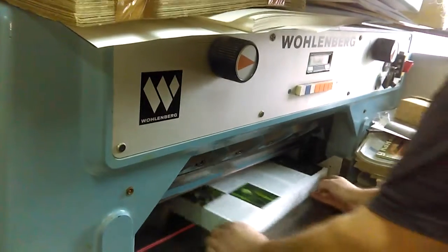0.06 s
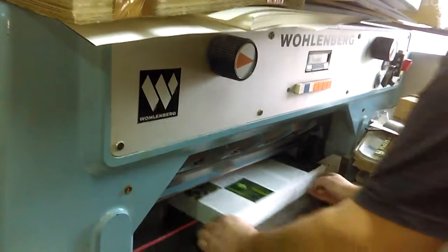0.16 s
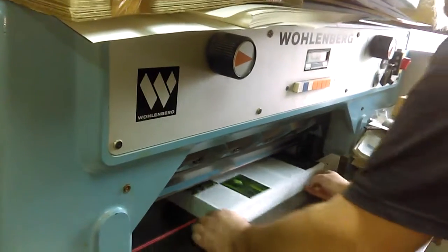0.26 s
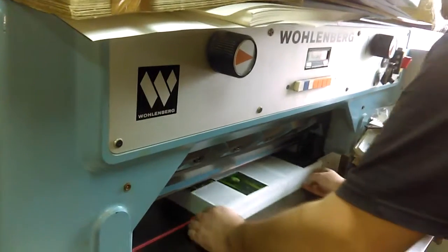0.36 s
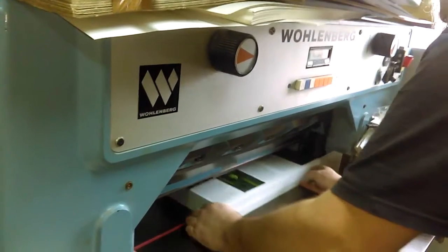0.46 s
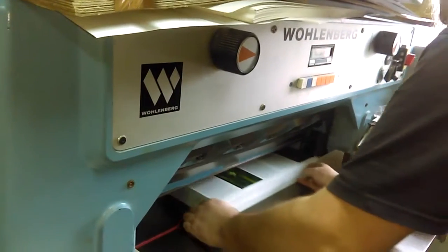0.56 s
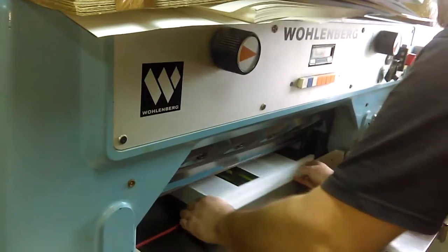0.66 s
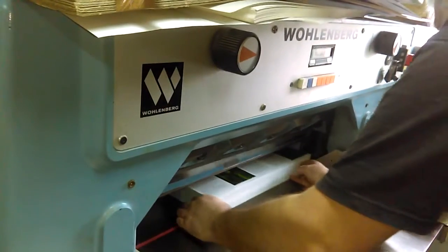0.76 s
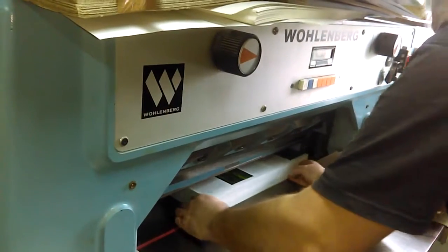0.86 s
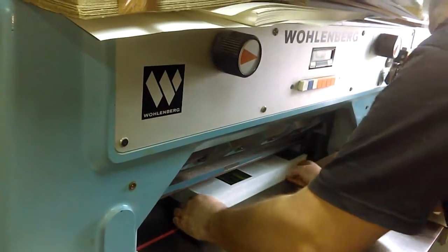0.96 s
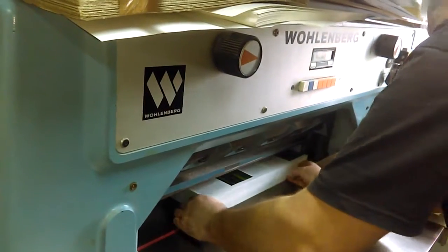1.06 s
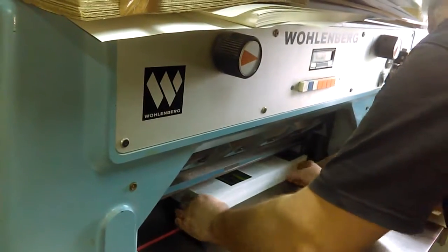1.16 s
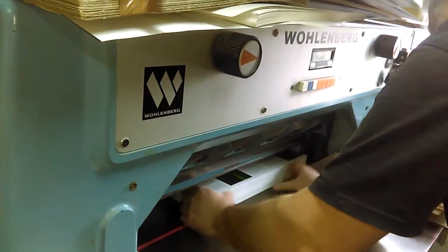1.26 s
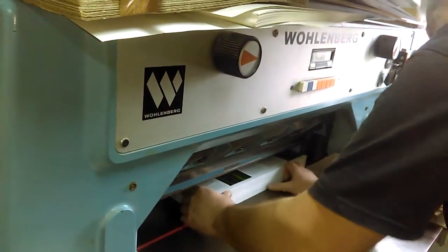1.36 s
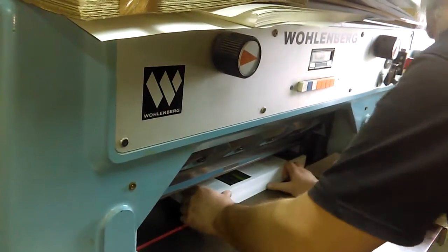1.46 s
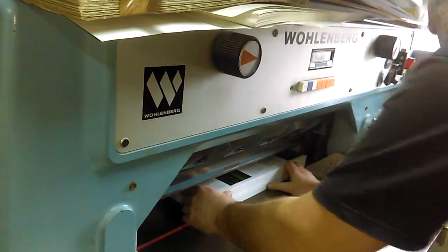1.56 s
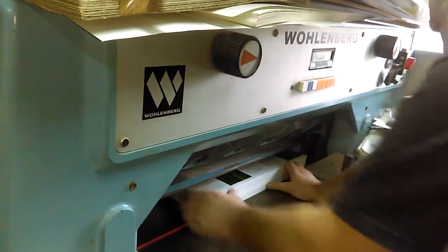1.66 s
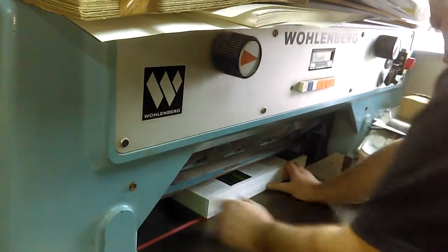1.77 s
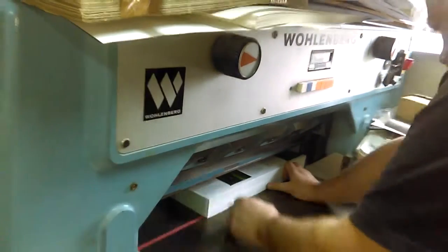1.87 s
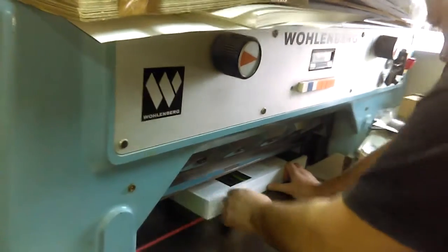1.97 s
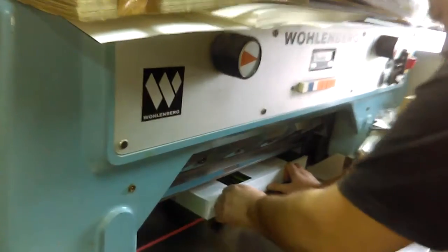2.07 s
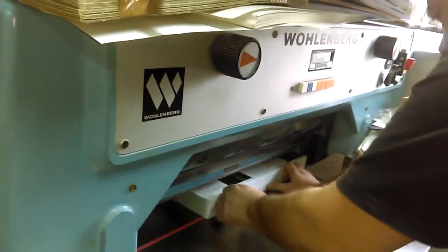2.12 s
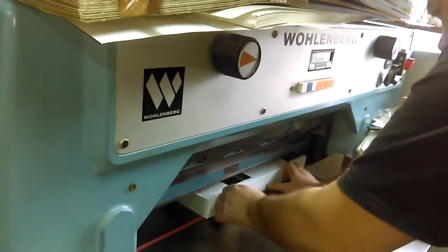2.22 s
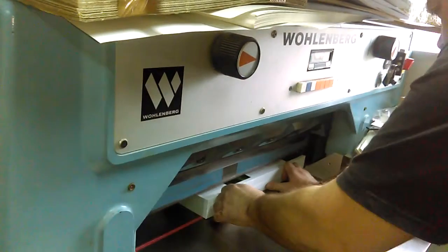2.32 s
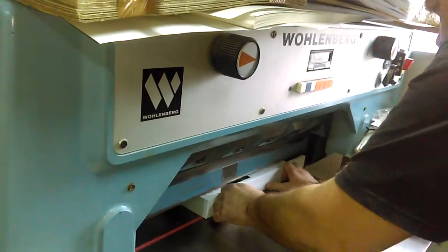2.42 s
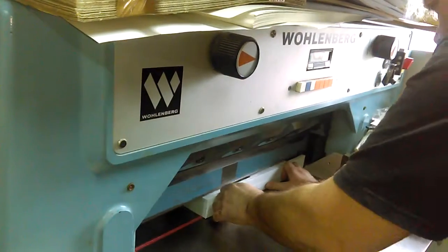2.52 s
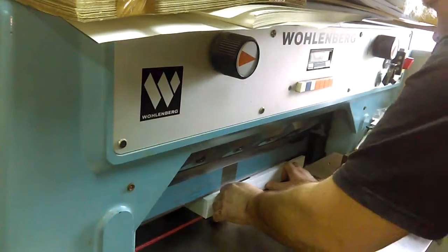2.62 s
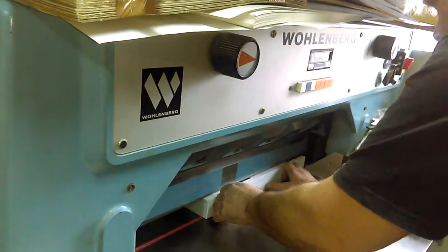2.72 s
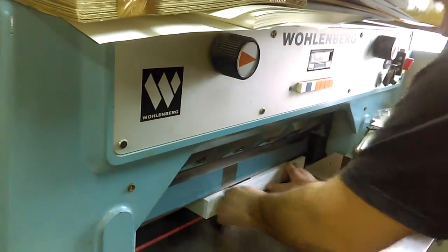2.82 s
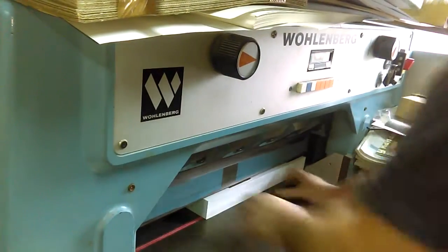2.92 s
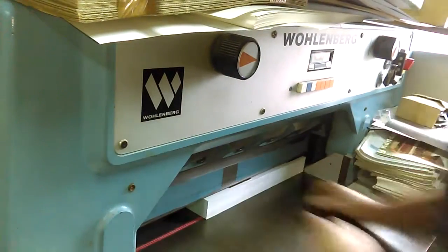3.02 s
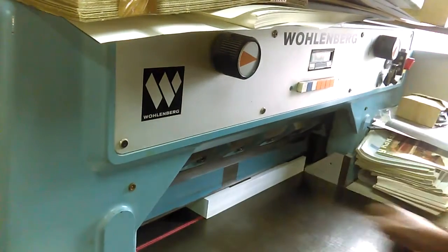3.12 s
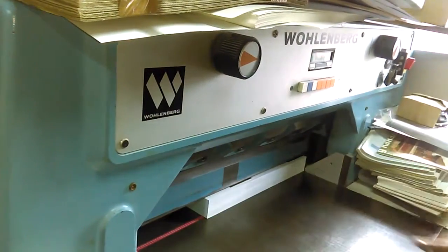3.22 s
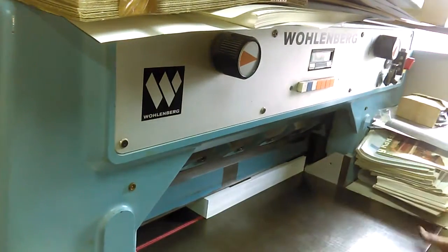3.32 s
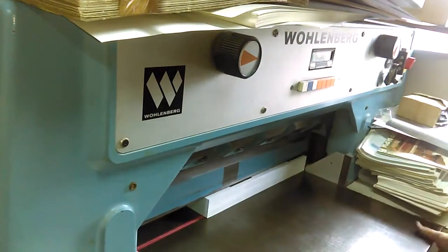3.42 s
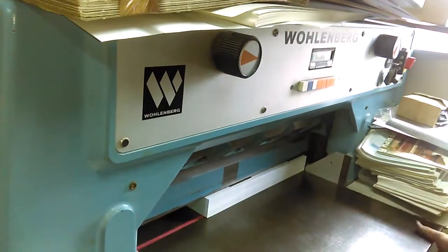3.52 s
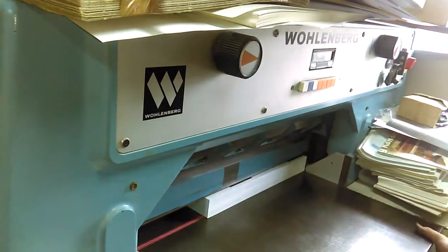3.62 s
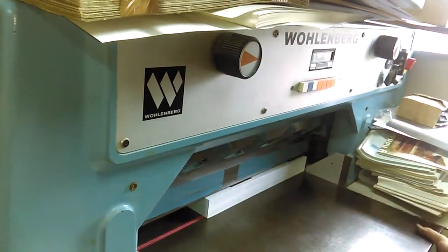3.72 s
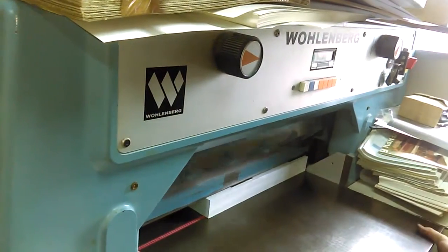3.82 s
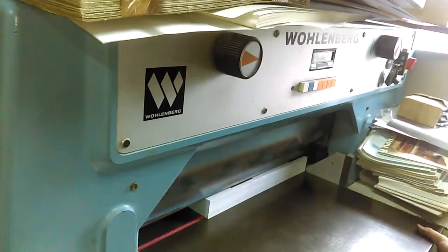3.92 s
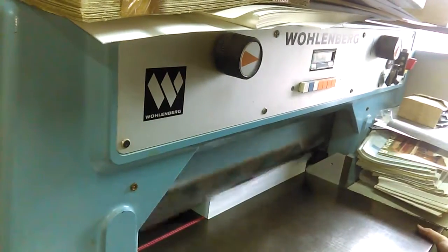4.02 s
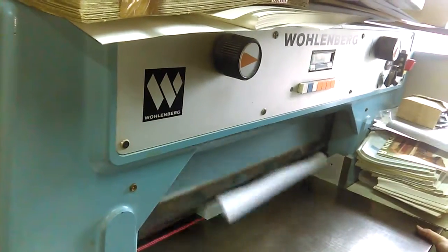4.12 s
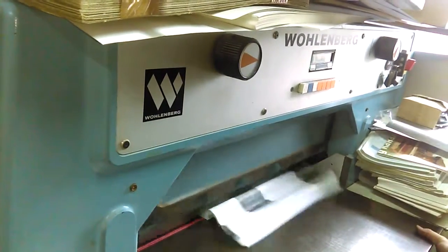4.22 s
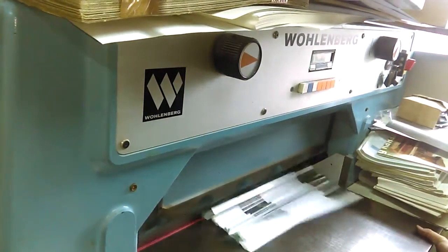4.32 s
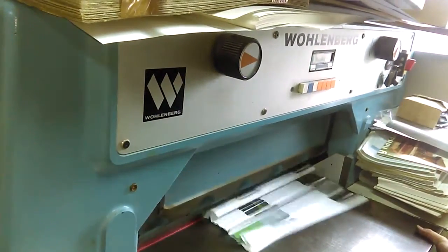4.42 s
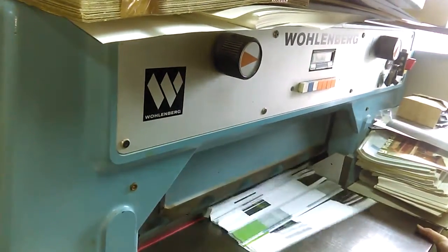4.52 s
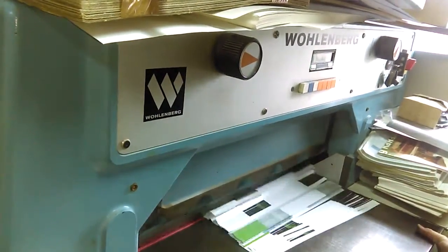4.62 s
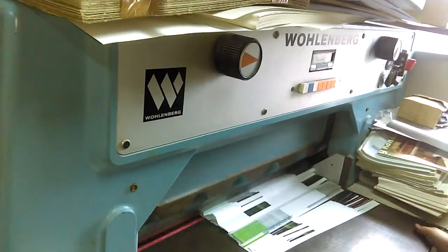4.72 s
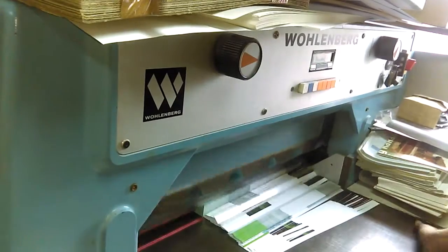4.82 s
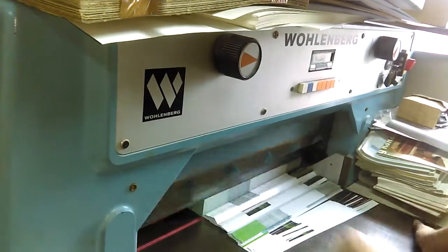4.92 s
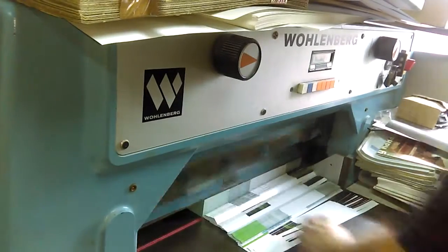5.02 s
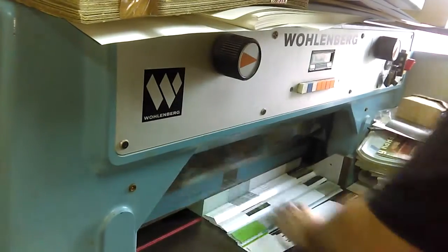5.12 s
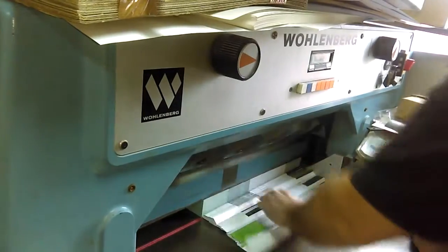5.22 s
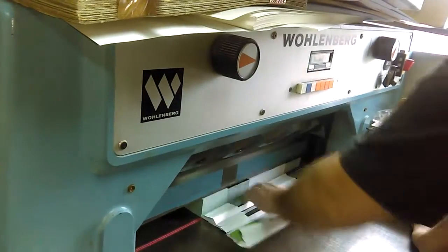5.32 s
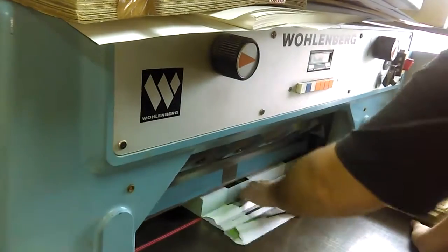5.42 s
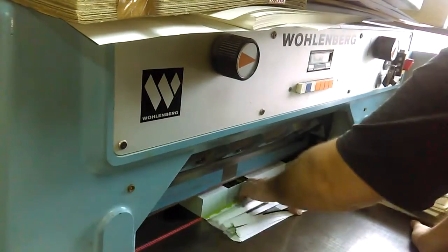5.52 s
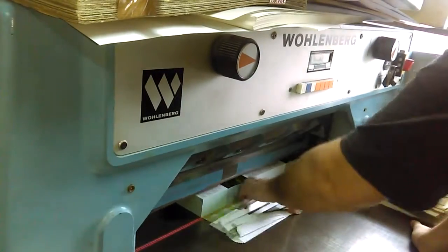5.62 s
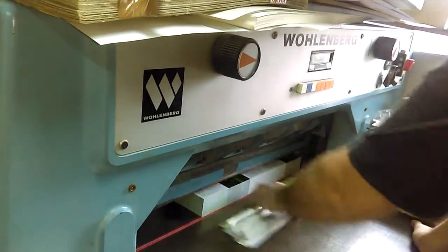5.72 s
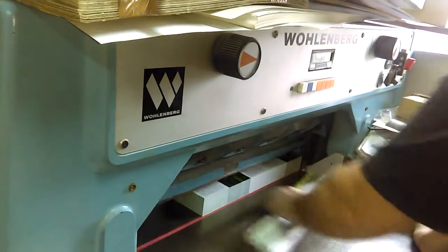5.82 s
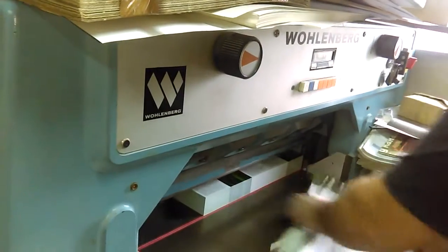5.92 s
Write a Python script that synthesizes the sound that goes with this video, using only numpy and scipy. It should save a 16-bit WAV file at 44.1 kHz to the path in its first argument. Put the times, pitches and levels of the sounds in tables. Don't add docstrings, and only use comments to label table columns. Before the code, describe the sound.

Close to a paper guillotine in a small print shop, a faint steady electric hum sits over low room noise. At about 0.3 s a loose stack slaps down with a soft flutter; firmer knocks against the metal gauge follow at 1.0 and 2.1 s. Hands slide and paper rustles lightly, with crisp touches from 2.4 to 3.5 s. At 3.65 s the clutch clacks with a bright metallic ring and the drive starts roaring. A short groan leads to the clamp's heavy slam at 3.9 s. From 4.06 to 4.48 s the blade bites hard and zips through the sheets, a bright gritty tear whose pitch falls steadily as it slows. Dull thumps and a paper flop end the cut around 4.5 s. Pump and gears whine and throb until a ringing brake clunk near 5.25 s, and the drive quickly stops. Hands rustle the offcuts away, with a small sharp knock at 5.95 s.

```python
import sys
import numpy as np
from scipy import signal
from scipy.fft import rfft, irfft, next_fast_len
from scipy.io import wavfile
from scipy.ndimage import uniform_filter1d

SR = 44100
rng = np.random.default_rng(int(sys.argv[2]) if len(sys.argv) > 2 else 0)


def file_out(sig):
    cols = np.atleast_2d(sig).T
    lim = np.clip(cols, -1, 1)
    pcm = np.round(lim * 32767).astype(np.int16)
    wavfile.write(sys.argv[1], SR, pcm)


def field_ratio(decibels):
    return 10 ** (np.asarray(decibels, dtype=float) / 20)


N = 263393
STEP = 32
TIME_S, SLOW_S = np.arange(N) / SR, np.arange(0, N, STEP) / SR
EDGES_HZ = 22 * 2 ** np.arange(0, 9.7, .4)
CENTRES_HZ = np.sqrt(EDGES_HZ[1:] * EDGES_HZ[:-1])

# frequency in Hz, side minus mid in dB.
SIDE_DB = [(60, -39), (110, -17.5), (200, -22), (380, -11.5), (700, -6), (1290, -2), (2380, 1), (4400, 2),
           (8120, -1), (15000, 0.5)]
# frequency in Hz, left minus right in dB.
LEFT_DB = [(60, 1), (110, 0.5), (200, 2), (380, -2), (700, 2), (1290, -6), (2380, -11), (4400, -8.5),
           (8120, -14), (15000, 0)]

# frequency in Hz, level in dB per Hz.
SHOP_COLOUR = [(25, -14), (55, -29), (100, -3.5), (220, -4.5), (450, -12), (900, -10.5), (1800, -18),
               (3200, -26), (6500, -32.5), (9500, -38), (13000, -42), (16000, -35)]
SHOP_DB, SHOP_SWELL_S, SHOP_SWELL_DB_PER_S = -51, 5.47, 10.5
ROOM_T60_S, WALL_CUT_HZ, ROOM_DB = 0.32, 7100, -10.5

# start in seconds, level in dB, t60 in seconds.
FLOOR_JOLTS = [
    (.97, -41, 0.79),
    (2.08, -35.5, 0.79),
    (2.7, -45, 0.74),
    (3.67, -48, .3),
    (3.9, -18.5, 1.3),
    (4.1, -39, 0.97),
    (4.55, -36, 2),
    (5.25, -30.5, 1.34),
]
FLOOR_HZ, FLOOR_IDLE_DB, FLOOR_RISE_S = 35.7, -72, 0.049
BED_HZ, BED_IDLE_DB, BED_BLOW_DB, BED_DRIVE_DB = 125.6, -55.5, -7, -1.5
BED_T60_S, BED_RISE_S = 0.57, 0.034

# multiple of BUZZ_HZ, level in dB.
BUZZ = [(1, -58), (2, -56), (3, -55), (4, -67.5), (5, -69.5), (6, -0.5), (7, -61), (8, -55.5), (9, 3.5),
        (10, -96), (11, -79), (12, -78), (13, -71), (14, -70), (17, -70), (18, -71), (19, -70.5),
        (30, -75.5)]
BUZZ_HZ = 100.1
PANEL_MULTIPLES = [6, 9]
# time in seconds, lower panel in dB, upper panel in dB.
PANEL_SHADE = [(0, -71, -61.5), (.45, -61, -58.5), (1.5, -50.5, -58.5), (1.85, -54.5, -63.5),
               (2.1, -53, -60), (2.5, -70, -67.5), (2.9, -60, -59), (3.6, -52, -51.5), (5.55, -62.5, -61),
               (5.97, -55.5, -51)]

# start in seconds, level in dB, centre in Hz, t60 in seconds.
RUSTLES = [(.975, -38, 3000, .2), (1.0, -44, 3000, .2), (4.47, -27, 2700, .4), (4.55, -35, 2700, .3),
           (5.59, -41, 3300, .08), (1.22, -57, 10900, .5), (1.668, -44, 6170, 0.16),
           (1.969, -47, 9000, 0.054), (2.185, -51, 8500, 0.066), (2.358, -46.5, 8100, 0.22),
           (2.40, -48.5, 8400, 0.23), (2.44, -50, 7940, 0.58), (2.533, -39, 9300, 0.088),
           (2.61, -46, 8300, 0.67), (2.38, -47, 2800, 0.97), (2.52, -47, 2840, 0.94),
           (2.63, -44.5, 2500, 0.44), (2.66, -43, 8500, 0.15), (2.811, -41.5, 8300, 0.11),
           (2.835, -39.5, 6400, 0.14), (3.004, -50.5, 9200, .3), (3.2, -46, 11700, 0.23),
           (3.423, -38, 5700, 0.19), (3.46, -39, 6500, 0.19), (5.428, -31, 4870, 0.22),
           (5.505, -30, 5000, 0.32), (5.592, -37, 4970, 0.12), (5.647, -47, 9450, 0.51),
           (5.712, -42, 4040, 0.5)]
# time in seconds, pan in dB.
HANDS = [(1.7, -9), (2.0, -10), (2.9, -12.5), (3.1, -2), (3.4, -10)]
# middle in seconds, half length in seconds, level in dB.
SLIDES = [(0.0, 0.35, -53.5), (.75, 0.31, -62.5), (1.623, 0.76, -65.5), (2.57, 0.11, -55),
          (3.12, 0.2, -55.5), (5.9, 0.37, -46.5)]

# frequency in Hz, level in dB per Hz.
DRIVE_COLOUR = [(15, -54), (25, -35), (108, 0.5), (175, -7), (242, -15), (309, -7), (344, -0.5),
                (394, -8.5), (754, -9), (936, -11), (2760, -22.5), (7110, -35), (10100, -38), (13200, -37),
                (16000, -79)]
ENGAGE_S, RELEASE_S, DRIVE_DB, SPIN_UP_S, RUN_DOWN_T60_S = 3.68, 5.31, -35.5, .01, 0.096
SHAFT_HZ, SHAFT_THROB_DB = 25.4, 0.5
# frequency in Hz, level in dB.
WHINE = [(96.9, -45.5), (247.6, -39), (344.5, -42), (495.3, -48), (619.1, -51), (742.9, -50),
         (791.3, -53.5), (893.6, -56), (1039, -54), (1114, -67), (1190, -56), (1410, -58), (1486, -53.5),
         (1733, -56.5), (2229, -60), (2724, -58), (2749, -56.5), (2821, -64), (2896, -62), (3192, -70),
         (3488, -82), (3962, -65), (4210, -64), (4234, -64), (4307, -69), (4452, -68), (10374, -69)]
# time in seconds, level in dB.
PRESSURE = [(3.67, -40), (3.70, -5.5), (4.05, 3.5), (4.5, -13.5), (4.7, 5), (5.3, 5), (5.4, -11),
            (5.6, -18), (5.7, -44)]
RETURN_HZ, RETURN_S, RETURN_HELD_DB = 344.5, 4.78, -14
# frequency in Hz, width in Hz, level over the drive colour in dB.
HOUSING = [(754, 160, 5), (1490, 150, 4.5), (2230, 210, 7.5), (2750, 220, 8.5), (3130, 170, 3.5),
           (3960, 74, 3), (4230, 300, 9.5), (5450, 360, 5.5), (9680, 200, 8), (10400, 200, 6),
           (11200, 500, 5)]
HOUSING_FLOOR_DB, GEARS_HZ, GEARS_DB, GEARS_FOLLOW = -1, 24.765, -36, .5

# start in seconds, 0.7-3 kHz in dB, body in dB, treble in dB, t60 in seconds.
BLOWS = [(0.321, -33, -46, -61, 0.08), (.354, -37.5, -40, -68, 0.29), (0.973, -21.5, -29.5, -53.5, 0.3),
         (2.060, -19, -26.5, -43, 0.35), (3.628, -39, -56, -32.5, 0.22), (3.677, -30, -43, -24, 0.27),
         (3.687, -26, -23, -33, 0.41), (3.719, -43, -26, -24.5, 0.48), (3.88, -10, -11, -26, 0.31),
         (4.066, -10, -15.5, -27, 0.24), (4.46, -22.5, -17.5, -33.5, 0.47), (4.49, -27, -25, -43, 0.3),
         (4.535, -29, -26, -45, 0.46), (4.566, -25, -16.5, -41.5, 0.41), (5.217, -26, -31, -36, 0.71),
         (5.252, -25, -15.5, -26.5, 0.37), (5.28, -24, -22.5, -47, 0.64), (5.947, -33.5, -57, -30, 0.22)]
BLOW_BANDS_HZ = [120, 380, 1400, 7000]
THUMP_DB = -5
# frequency in Hz, t60 factor.
LINGER = [(30, 2.1), (100, 1.4), (400, 0.81), (2000, 0.69), (10000, 0.58)]
# frequency in Hz, level in dB, t60 in seconds.
FRAME = [(127, -12, 0.33), (228, -38, 0.8), (324.7, 3.5, 0.18), (471, 2, 0.31), (630, -18, 0.7),
         (1370, -34, 0.5), (1696, -8, 0.045), (1860, -50, 0.17), (1870, -48, 0.67), (2150, -47, 0.38)]
# frequency in Hz, level in dB, t60 in seconds.
STACK = [(480, -1, .09), (590, 1, .12), (690, -5, 0.063), (980, -20, .08), (1114, -9, .1)]
# start in seconds, level in dB.
STACK_SLAPS = [(.352, -36), (.358, -25), (.367, -32), (.375, -30), (.384, -38), (.397, -38), (.41, -43)]
# start in seconds, level in dB, frequency in Hz, t60 in seconds.
TICKS = [(1.03, -53, 2640, 0.12), (1.062, -53, 2640, 0.17), (.974, -33, 1600, .06),
         (.975, -30.5, 480, 0.075), (.323, -39, 1300, .02), (3.631, -40, 3200, .015),
         (.323, -48, 2000, .015), (3.884, -9, 1500, .015), (3.729, -17, 10500, .03),
         (2.064, -40.5, 3680, 0.24), (2.1, -48, 3680, .2), (2.183, -49, 2650, 0.044),
         (2.088, -35, 2260, .06), (.323, -39, 900, 0.032), (4.459, -11, 520, 0.038), (4.399, -17, 470, .05),
         (5.89, -47, 1850, 0.055), (3.882, -15.5, 1870, 0.056), (2.062, -25, 2060, 0.052),
         (2.063, -20, 1054, 0.043), (5.276, -29, 5260, 0.18), (5.273, -18.5, 391, 0.15),
         (5.33, -30, 121, 0.91), (2.19, -38.5, 76, .5), (3.678, -31.5, 2090, .05), (3.702, -29, 2040, .06),
         (3.634, -35, 1670, 0.044), (3.689, -19, 166, .08), (3.79, -27, 147, .12), (3.885, -13, 424, 0.044),
         (3.701, -16.5, 117, 0.15), (3.883, -10.5, 327, 0.15), (3.92, -14, 482, 0.1),
         (4.072, -10, 2830, 0.038), (4.071, -9.5, 331, 0.14), (5.257, -23.5, 2680, 0.066),
         (5.259, -28.5, 1930, 0.11), (5.571, -35.5, 1570, 0.036), (5.59, -39, 3450, 0.035),
         (5.947, -17.5, 2010, 0.015), (5.946, -29, 1160, 0.029), (5.947, -42, 3370, 0.024)]
# frequency in Hz, width in Hz, level in dB, delay in seconds.
CLUTCH = [(5067, 59, -3, 0.013), (5420, 210, -3, 0.01), (5230, 190, -3.5, 0.00074), (5440, 130, -5, 0.001),
          (9870, 240, -8.5, 0.016), (10020, 140, -7.5, 0.0067), (10540, 44, -3.5, 0.0026),
          (10350, 210, -4, 0.0012), (10950, 160, -4.5, 0.001), (12650, 250, -36, .01),
          (14900, 400, -42, .02)]
# start in seconds, level in dB, build-up in seconds, t60 in seconds.
CLUTCH_SLIPS = [
    (3.713, -3, 0.0058, 0.13),
    (5.26, -16.5, 0.01, 0.11),
]
CLUTCH_RUB_DB = -17
GROAN_S, GROAN_END_S, GROAN_RISE_S, GROAN_HZ, GROAN_WIDTH_HZ, GROAN_DB = 3.74, 3.94, .04, 490, 26, -33

# frequency in Hz, level in dB per Hz.
TEARING_COLOUR = [(150, -38), (500, -35), (1200, -7), (2500, 3.5), (4500, -2.5), (6500, 1), (8500, -3),
                  (12500, -5.5), (16000, -16)]
TEAR_DB, TEAR_FADE_DB_PER_S, TEAR_KNEE_S, TEAR_FOLLOWS, CUT_PAN_DB = -20, -30, 4.194, 0.065, -9
# time in seconds, sheets per second.
SHEETS = [(4.059, 1920), (4.115, 1750), (4.158, 1590), (4.244, 1157), (4.318, 846), (4.345, 700),
          (4.385, 545), (4.42, 455), (4.48, 300)]
# time in seconds, level in dB.
BITE = [(4.065, -19), (4.085, -8), (4.11, -6), (4.145, 0), (4.19, -4.5), (4.235, 0.5), (4.3, 0), (4.39, -1),
        (4.48, -7.5)]
# start in seconds, level over the tone in dB.
BUNCHES = [(4.12, 4), (4.14, 9), (4.154, 8), (4.172, 3), (4.221, 6), (4.237, 4), (4.264, 4), (4.295, 3),
           (4.312, 8), (4.33, 3), (4.352, 4), (4.364, 5), (4.398, 6), (4.412, 5), (4.44, 3), (4.455, 5)]
BUNCH_S, BETWEEN_DB = .007, -3
# frequency in Hz, width in Hz, level in dB.
SNAP = [(430, 100, -21), (590, 70, -17), (790, 130, -13), (1230, 130, -13), (1684, 160, -19),
        (2240, 300, -18), (3200, 590, -21), (3670, 400, -21), (5200, 1100, -21)]


def in_time(rows, step=1):
    s, *columns = np.transpose(rows)
    return [np.interp(np.arange(0, N, step) / SR, s, c, left=c[0], right=c[-1]) for c in columns]


def at_hz(points, hz):
    table_hz, value = np.array(points).T
    return np.interp(np.log(hz), np.log(table_hz), value)


def drift(rate_hz, count):
    r = np.exp(-2 * np.pi * rate_hz * STEP / SR)
    white = rng.standard_normal((count, N // STEP + 3001))
    slow = signal.lfilter([1], [1, -2 * r, r * r], white)[:, 3000:]
    return slow / slow.std(axis=1, keepdims=True)


def full(slow):
    return np.interp(np.arange(N) / STEP, np.arange(len(slow)), slow)


def sides(pan_db):
    return field_ratio(np.array([pan_db / 2, -pan_db / 2]))


def balance():
    return field_ratio(np.outer([1, -1], at_hz(LEFT_DB, CENTRES_HZ)))[:, :, None]


def band_share(colour):
    power = field_ratio(at_hz(colour, CENTRES_HZ)) ** 2 * np.diff(EDGES_HZ)
    return (power / power.sum())[:, None]


def noise_bank(power):
    out, white = np.zeros((2, N)), rng.standard_normal((2, 2, N + SR))
    for k, (low, high) in enumerate(zip(EDGES_HZ, EDGES_HZ[1:])):
        band = signal.butter(2, [low, high], "band", fs=SR, output="sos")
        mid, side = signal.sosfilt(band, white[k % 2])[:, SR:]
        wide = field_ratio(at_hz(SIDE_DB, CENTRES_HZ[k]))
        unit = np.sqrt(SR / 2 / (high - low) / (1 + wide ** 2))
        for c, sign in enumerate((1, -1)):
            out[c] += unit * full(np.sqrt(power[c, k])) * (mid + sign * wide * side)
    return out


def dying(start_s, t60_s, rise_s):
    t = np.maximum(SLOW_S - start_s, 0)
    return ((1 - np.exp(-t / rise_s)) * field_ratio(-60 * t / t60_s)) ** 2


def resonate(x, hz, width_hz):
    r = np.exp(-np.pi * width_hz / SR)
    poles = [1, -2 * r * np.cos(2 * np.pi * hz / SR), r * r]
    return signal.lfilter(np.array([1, 0, -1]) * (1 - r * r) / 2, poles, x)


def peaks(rows, hz):
    return np.sqrt(sum(field_ratio(db) ** 2 / (1 + (2 * (hz - top_hz) / width_hz) ** 2) for top_hz, width_hz, db in rows))


def high_pass(x, hz):
    return signal.sosfilt(signal.butter(2, hz, "high", fs=SR, output="sos"), x)


def struck(modes, hits, spread_db, t60_most_s):
    out, chance = np.zeros((2, N)), rng.standard_normal((len(hits), len(modes), 3))
    for k, (hz, level_db, t60_s) in enumerate(modes):
        clicks, apart = np.full((2, N), 1e-18), field_ratio(at_hz(SIDE_DB, hz))
        for (s, db), luck in zip(hits, chance[:, k]):
            luck_db = spread_db * (luck[0] + apart * luck[1:])
            clicks[:, round(s * SR)] = field_ratio(db + level_db + luck_db)
        r, w = field_ratio(-60 / (min(t60_s, t60_most_s) * SR)), 2 * np.pi * hz / SR
        out += signal.lfilter([0, np.sin(w)], [1, -2 * r * np.cos(w), r * r], clicks)
    return out


def tones(lines, gains_db, wobble_db, rate_hz):
    out, wander = np.zeros((2, N)), drift(rate_hz, count=len(lines))
    phases = rng.random((len(lines), 2))
    for (hz, db), gain_db, w, phase in zip(lines, gains_db, wander, phases):
        lead = 2 * np.arctan(field_ratio(at_hz(SIDE_DB, hz)))
        level = np.sqrt(2) * full(field_ratio(db + gain_db + wobble_db * w)) * sides(at_hz(LEFT_DB, hz))[:, None]
        out += level * np.sin(2 * np.pi * (hz * TIME_S + phase[0]) + np.array([[0], [lead]]))
    return out


def engaged():
    run_down = field_ratio(-60 * np.maximum(SLOW_S - RELEASE_S, 0) / RUN_DOWN_T60_S) ** 2
    return field_ratio(DRIVE_DB) ** 2 * dying(ENGAGE_S, 72, SPIN_UP_S) * run_down


def shop_power():
    swell_db = SHOP_SWELL_DB_PER_S * np.maximum(SLOW_S - SHOP_SWELL_S, 0)
    patches_db = 0.57 * drift(8.6, count=len(CENTRES_HZ))
    return band_share(SHOP_COLOUR) * field_ratio(SHOP_DB + swell_db + patches_db) ** 2 * balance() ** 0.87


def shop_echo(x):
    size = next_fast_len(N + SR)
    hz = np.arange(size // 2 + 1) * SR / size
    out = []
    for lags_s in rng.uniform(.02, .05, (2, 6)):
        wall = 1 / (1 + 1j * hz / WALL_CUT_HZ)
        loops = [field_ratio(-60 * lag / ROOM_T60_S) * wall * np.exp(-2j * np.pi * hz * lag) for lag in lags_s]
        out.append(irfft(rfft(x, size) * sum(g / (1 - g) for g in loops), size)[:N])
    return np.array(out)


def shaking():
    floor = field_ratio(FLOOR_IDLE_DB) ** 2
    floor = floor + sum(field_ratio(db) ** 2 * dying(s, t60_s, FLOOR_RISE_S) for s, db, t60_s in FLOOR_JOLTS)
    bed = field_ratio(BED_IDLE_DB) ** 2 + field_ratio(BED_DRIVE_DB) ** 2 * engaged()
    for s, mid_db, body_db, *rest in BLOWS:
        bed = bed + field_ratio(body_db + BED_BLOW_DB) ** 2 * dying(s, BED_T60_S, BED_RISE_S)
    out = 0
    for hz, width_hz, power in zip((FLOOR_HZ, BED_HZ), (12.0, 70.0), (floor, bed)):
        hum = resonate(resonate(rng.standard_normal(N + SR), hz, width_hz), hz, 2 * width_hz)[SR:]
        envelope = np.sqrt(uniform_filter1d(hum ** 2, size=6000))
        out = out + field_ratio(-5.0) * full(np.sqrt(power)) * hum / envelope
    return out


def buzz():
    panel_db = dict(zip(PANEL_MULTIPLES, in_time(PANEL_SHADE, STEP)))
    gains_db = [panel_db.get(k, 0) for k, db in BUZZ]
    return tones([(k * BUZZ_HZ, db) for k, db in BUZZ], gains_db, wobble_db=-0.5, rate_hz=3.0)


def rustle_power():
    sliding = sum(field_ratio(db) ** 2 * np.exp(-2 * ((SLOW_S - s) / half_s) ** 2) for s, half_s, db in SLIDES)
    hiss_db = -10.0 - 107 * np.log2(CENTRES_HZ / 9800)[:, None] ** 2
    power = sliding * field_ratio(hiss_db) ** 2 * np.ones((2, 1, 1))
    for s, db, hz, t60_s in RUSTLES:
        pan_db = np.interp(s, *np.transpose(HANDS))
        octaves = np.log2(CENTRES_HZ / hz)[:, None]
        slope = np.where(CENTRES_HZ > hz, 16.0, 3.5)[:, None]
        puff = field_ratio(db - 14.0 - slope * octaves ** 2) * sides(pan_db)[:, None, None]
        power = power + puff ** 2 * dying(s, max(t60_s, .03), 0.028 * t60_s ** 2 + .0005)
    return power * field_ratio(2.0 * drift(130, count=1)) ** 2


def drive_power():
    throb_db = SHAFT_THROB_DB * np.sin(2 * np.pi * SHAFT_HZ * SLOW_S) + 0.46 * drift(45, count=len(CENTRES_HZ))
    return band_share(DRIVE_COLOUR) * engaged() * field_ratio(throb_db) ** 2 * balance() ** 0.87


def gears():
    size = round(SR / GEARS_HZ)
    hz = np.maximum(np.arange(size // 2 + 1) * GEARS_HZ, 1)
    colour = field_ratio(at_hz(DRIVE_COLOUR, hz)) * np.hypot(field_ratio(HOUSING_FLOOR_DB), peaks(HOUSING, hz))
    mid, side = rfft(rng.standard_normal((2, size))) * colour
    apart = field_ratio(at_hz(SIDE_DB, hz)) * side
    turn = irfft(np.array([mid + apart, mid - apart]) * sides(at_hz(LEFT_DB, hz)), size)
    level = field_ratio(GEARS_DB + GEARS_FOLLOW * in_time(PRESSURE)[0]) * full(np.sqrt(engaged())) / field_ratio(DRIVE_DB)
    return level * np.tile(turn / turn.std(), N // size + 1)[:, :N]


def whine():
    turn = np.sin(2 * np.pi * SHAFT_HZ * SLOW_S)
    pressure_db = in_time(PRESSURE, STEP)[0]
    held_db = RETURN_HELD_DB * np.clip((RETURN_S - SLOW_S) / 0.038, 0, 1)
    gains_db = []
    for hz, db in WHINE:
        pulse_db = 2.5 * min(hz / 2500, 1) * turn
        gains_db.append(pressure_db + pulse_db + held_db * (abs(hz - RETURN_HZ) < 20))
    return tones(WHINE, gains_db, wobble_db=0.66, rate_hz=5.3)


def blow_power():
    power, linger = 0, at_hz(LINGER, CENTRES_HZ)[:, None]
    rise_s = 0.0026 + 0.89 / CENTRES_HZ[:, None]
    for s, mid_db, body_db, treble_db, t60_s in BLOWS:
        thump_db = body_db + THUMP_DB
        top_db = treble_db - 6.5 + 0.22 * min(treble_db - mid_db, 0)
        anchors = list(zip(BLOW_BANDS_HZ, (thump_db, body_db, mid_db, treble_db)))
        colour_db = at_hz([(30, thump_db - 65)] + anchors + [(15000, top_db)], CENTRES_HZ)[:, None]
        power = power + field_ratio(colour_db - 10.0) ** 2 * dying(s, np.clip(t60_s, .05, .45) * linger, rise_s)
    lumps_db = 0.46 * drift(100, count=1) + 2.6 * drift(68, count=len(CENTRES_HZ))
    return power * field_ratio(lumps_db) ** 2 * balance()


def frame():
    hits = [(s, body_db - 12.0) for s, mid_db, body_db, *rest in BLOWS]
    return struck(FRAME, hits, spread_db=4.1, t60_most_s=0.5)


def stack():
    slaps = struck(STACK, STACK_SLAPS, spread_db=1.5, t60_most_s=0.07)
    return resonate(resonate(slaps, 640, 900), 640, 900)


def ticks():
    out = np.zeros((2, N))
    for s, db, hz, t60_s in TICKS:
        start = round(s * SR)
        t = np.arange(min(round(2 * t60_s * SR), N - start)) / SR
        ring = field_ratio(db - 60 * t / t60_s) * (1 - np.exp(-t * hz / 2)) * np.sin(2 * np.pi * hz * t)
        out[:, start:start + len(t)] += ring * sides(at_hz(LEFT_DB, hz))[:, None]
    return out


def clutch():
    start = round(ENGAGE_S * SR)
    slip_power = sum(field_ratio(db) ** 2 * dying(s, t60_s, rise_s) for s, db, rise_s, t60_s in CLUTCH_SLIPS)
    slips = full(np.sqrt(slip_power))[start:]
    rub = field_ratio(CLUTCH_RUB_DB) * full(np.sqrt(engaged()))[start:]
    shared, left, right = rng.standard_normal((3, N))[:, start:]
    friction, rings = shared + 1.5 * np.array([left, right]), np.zeros((2, N))
    for k, (hz, width_hz, db, delay_s) in enumerate(CLUTCH):
        high = hz > 8000
        force = friction * (np.roll(slips, round(delay_s * SR)) + high * rub)
        ring = resonate(resonate(force, hz, width_hz), hz, 6 * width_hz)
        ring = ring * sides(-2.5 if high else -9.0)[:, None]
        rings[:, start:] += field_ratio(db - 12.0) * np.sqrt(SR / 4 / width_hz) * ring * (-1) ** k
    return rings


def groan():
    hum = resonate(rng.standard_normal(N), GROAN_HZ, GROAN_WIDTH_HZ)
    hum = resonate(hum, GROAN_HZ, 3 * GROAN_WIDTH_HZ)
    swell = np.clip((TIME_S - GROAN_S) / GROAN_RISE_S, 0, 1) * np.clip((GROAN_END_S - TIME_S) / 0.015, 0, 1)
    return field_ratio(GROAN_DB) * swell * hum / np.sqrt(uniform_filter1d(hum ** 2, size=3000))


def cutting(t):
    return (t > SHEETS[0][0]) * np.clip((SHEETS[-1][0] - t) / 0.035, 0, 1)


def tearing_power():
    fade_db = TEAR_FADE_DB_PER_S * np.maximum(SLOW_S - TEAR_KNEE_S, 0)
    tear_db = TEAR_DB + fade_db + TEAR_FOLLOWS * in_time(BITE, STEP)[0]
    level = field_ratio(tear_db + 1.0 + 1.5 * drift(200, count=1)) * cutting(SLOW_S)
    pan_db = CUT_PAN_DB * np.clip(2 - CENTRES_HZ / 5500, 0, 1)
    return band_share(TEARING_COLOUR) * (level * sides(pan_db)[:, :, None]) ** 2


def zip_through(jitter, uneven_db, fall_db, lead_s):
    out, cut = np.zeros((2, N)), slice(round(SHEETS[0][0] * SR), round(SHEETS[-1][0] * SR))
    t, rate_hz = TIME_S[cut], in_time(SHEETS)[0][cut]
    bite_db = in_time(BITE)[0][cut] + BETWEEN_DB
    for s, db in BUNCHES:
        bite_db = bite_db + db * np.clip((t - s) / .0015, 0, 1) * np.exp(-np.maximum(t - s, 0) / BUNCH_S)
    slip, groups, *lumps = (full(row)[cut] for row in drift(138.4, count=12))
    uneven_rate_hz = rate_hz * (1 + jitter * np.sqrt(1500 / rate_hz) * slip)
    turns = np.cumsum(uneven_rate_hz) / SR + rate_hz * np.array([[lead_s], [0]])
    tone = 0
    for k, lump in enumerate(lumps, 1):
        level = field_ratio(bite_db - fall_db * (k - 1) + uneven_db * (lump + .4 * groups)) * peaks(SNAP, k * rate_hz)
        tone = tone + level * np.cos(2 * np.pi * k * turns + k * k) * sides(at_hz(LEFT_DB, k * rate_hz))
    out[:, cut] = field_ratio(3.0) * tone * cutting(t)
    return out


def scene():
    noise = noise_bank(shop_power() + rustle_power() + drive_power() + blow_power() + tearing_power())
    sharp = frame() + stack() + ticks() + clutch()
    sharp = sharp + zip_through(jitter=.03, uneven_db=3.4, fall_db=1.6, lead_s=.00012)
    echo = high_pass(shop_echo(sharp.mean(axis=0)), 400)
    return noise + shaking() + buzz() + gears() + whine() + groan() + sharp + field_ratio(ROOM_DB) * echo


def band_limit(x):
    return signal.sosfilt(signal.butter(12, 16460, fs=SR, output="sos"), x)


def record(dry):
    dip = 0.58 * resonate(dry, hz=7090, width_hz=2100)
    peak = 0.49 * resonate(dry, hz=9330, width_hz=4100)
    heard = high_pass(dry - dip + peak, 24)
    top_cut = signal.cheby2(20, 70, 16280, fs=SR, output="sos")
    mix = signal.sosfilt(top_cut, np.tanh(heard))
    return band_limit(mix)


dry = scene()
out = record(dry)
file_out(out)
```